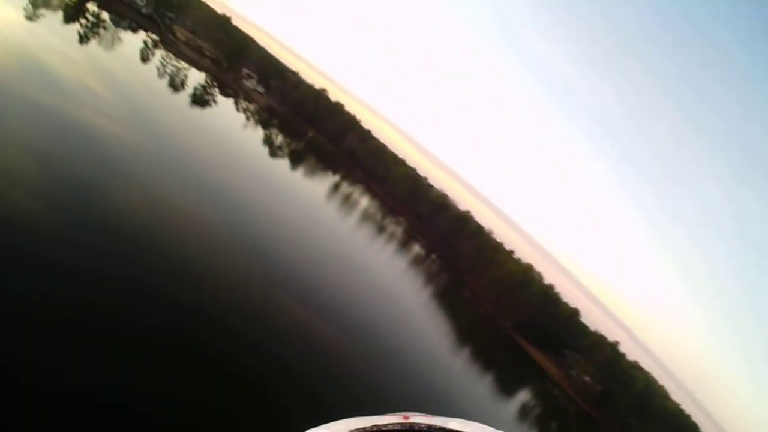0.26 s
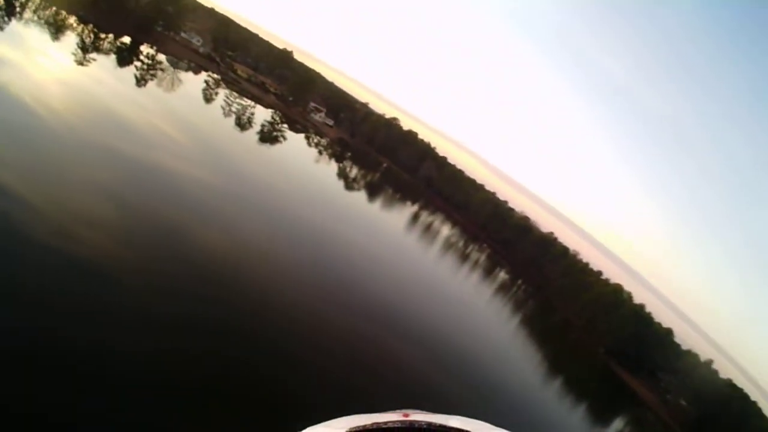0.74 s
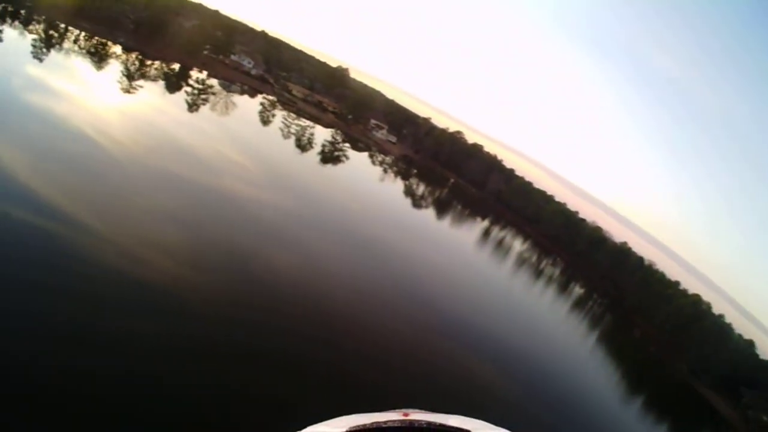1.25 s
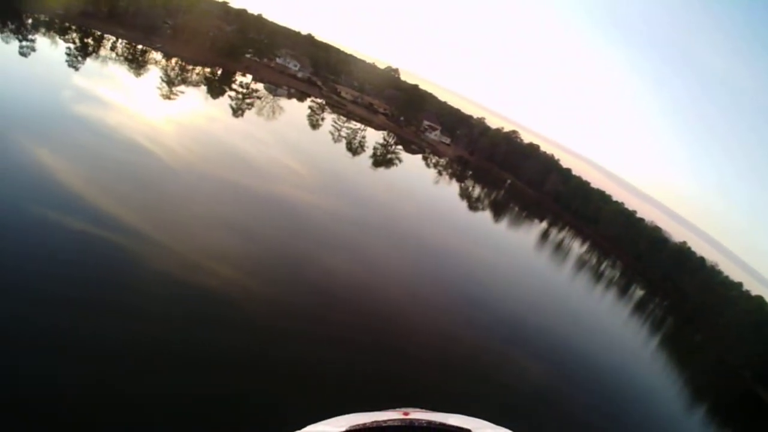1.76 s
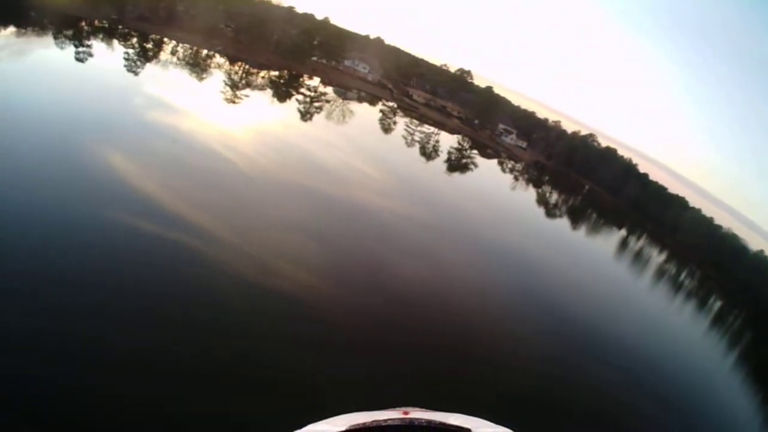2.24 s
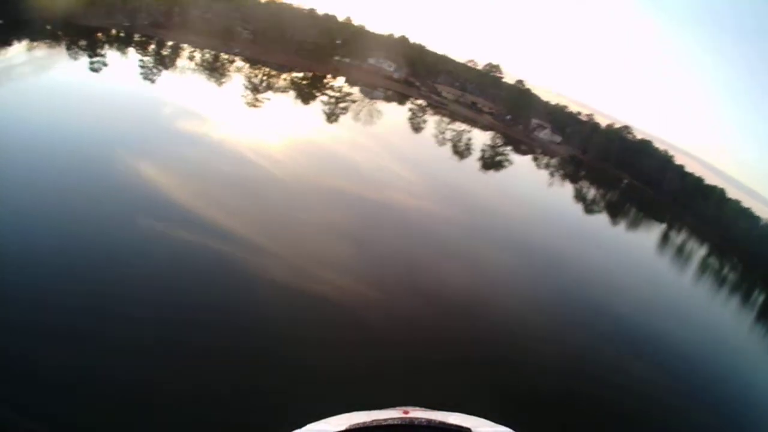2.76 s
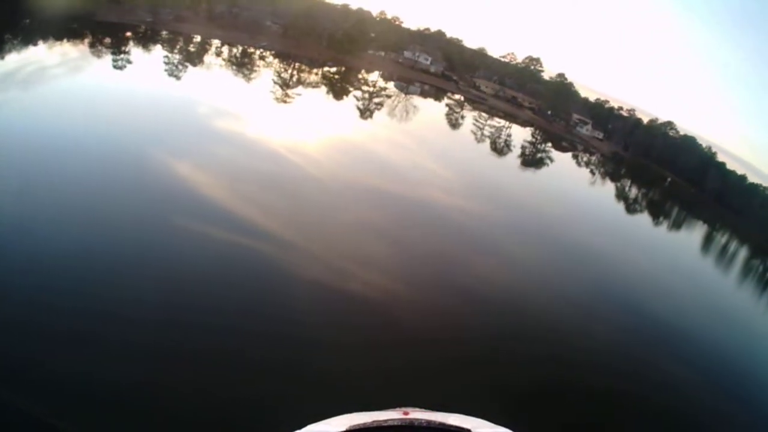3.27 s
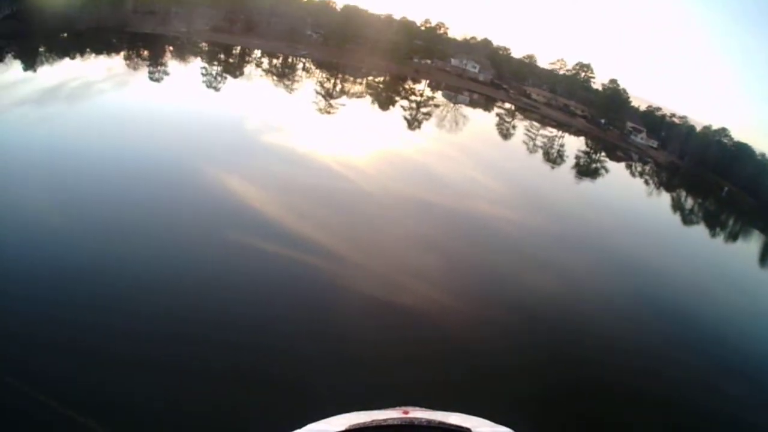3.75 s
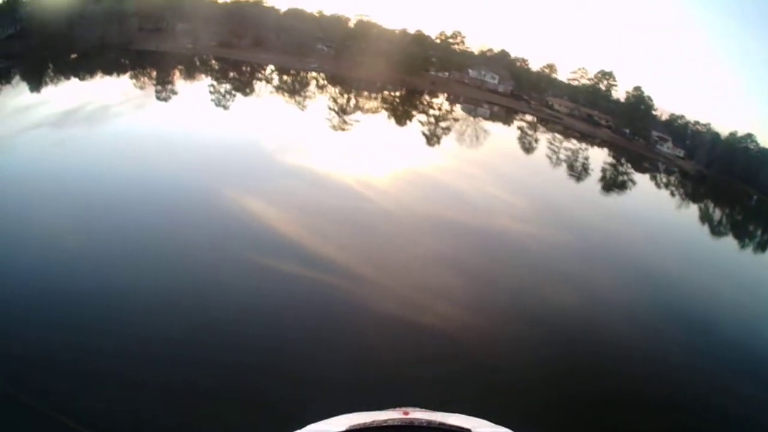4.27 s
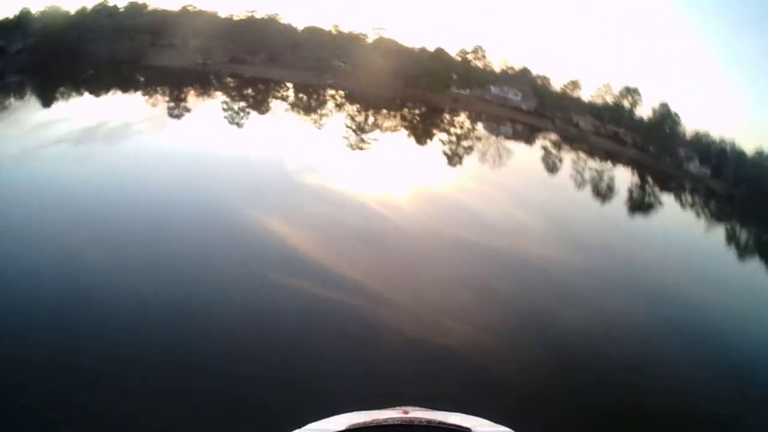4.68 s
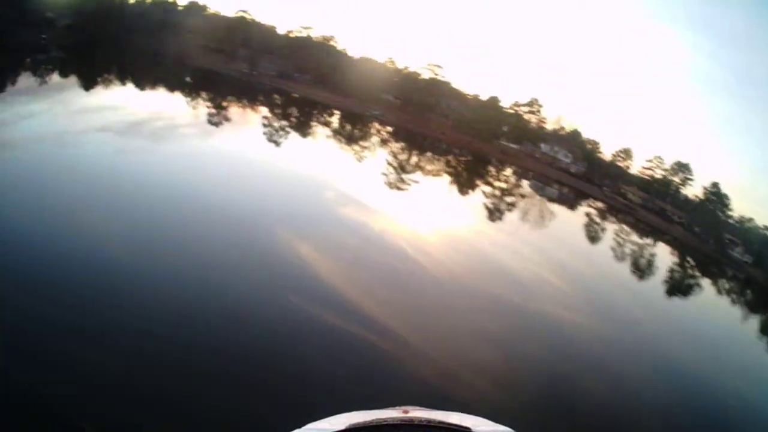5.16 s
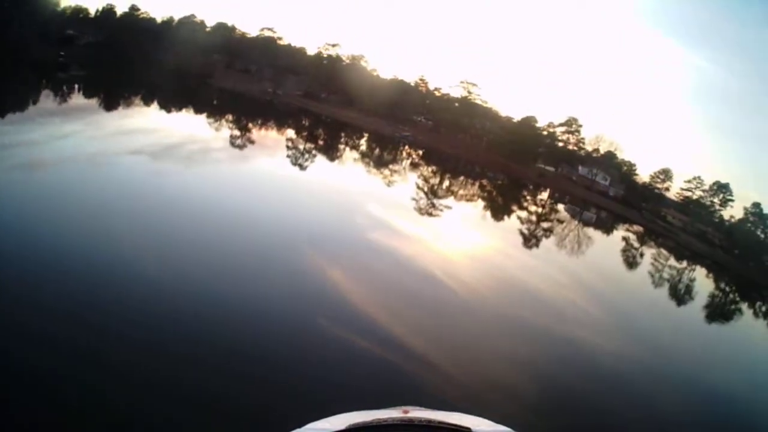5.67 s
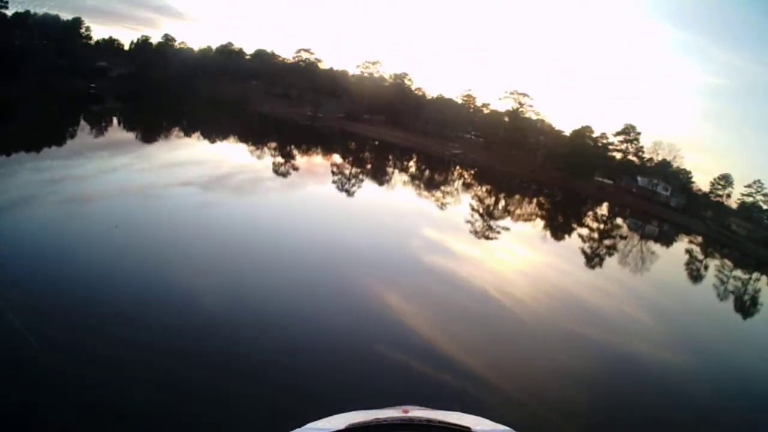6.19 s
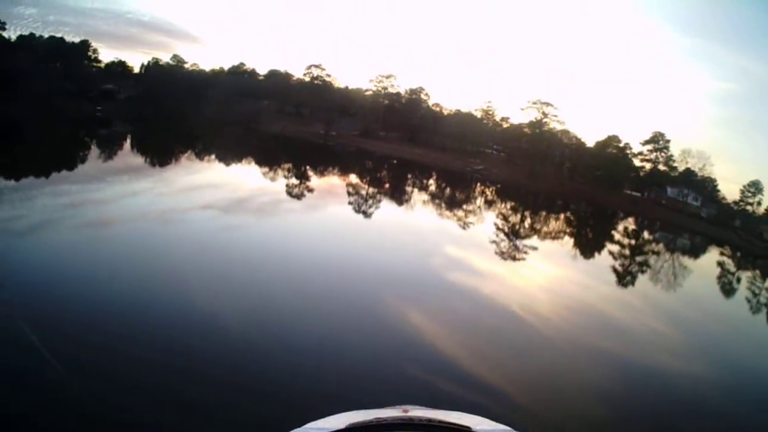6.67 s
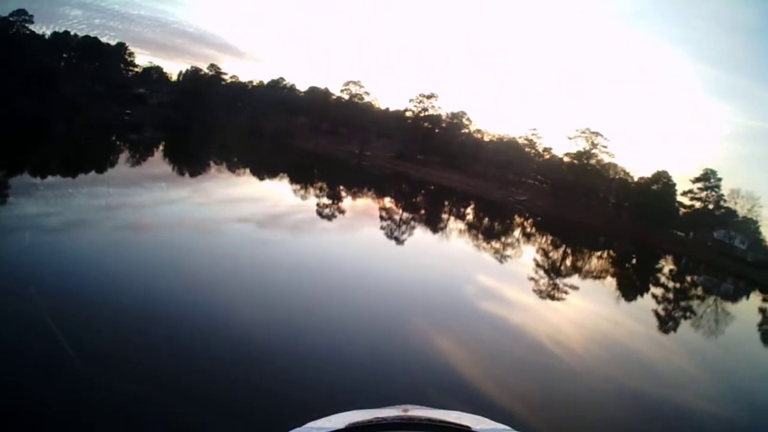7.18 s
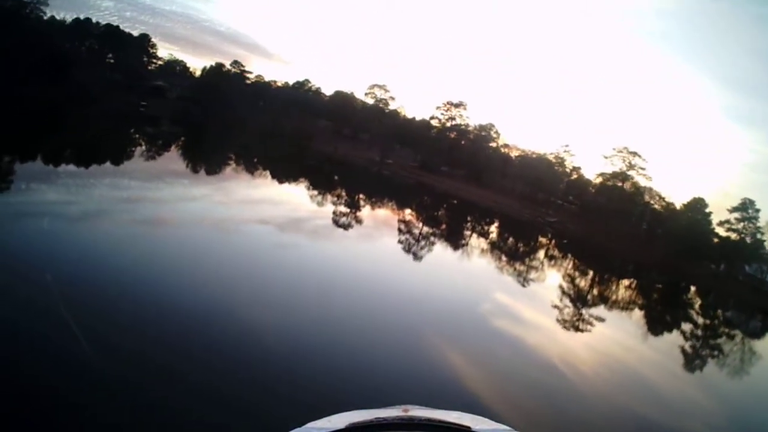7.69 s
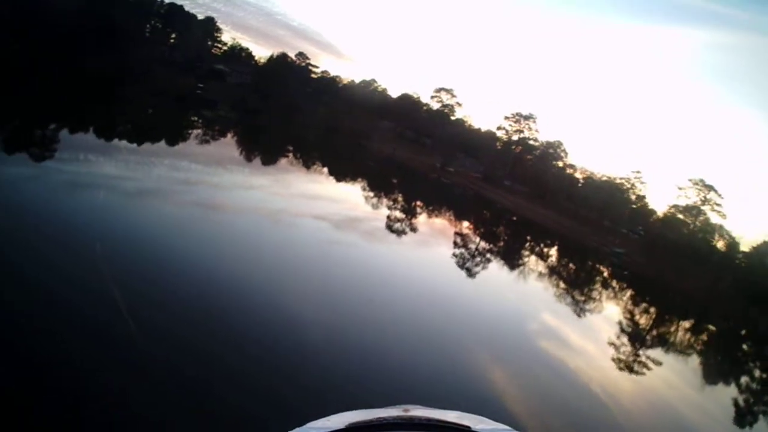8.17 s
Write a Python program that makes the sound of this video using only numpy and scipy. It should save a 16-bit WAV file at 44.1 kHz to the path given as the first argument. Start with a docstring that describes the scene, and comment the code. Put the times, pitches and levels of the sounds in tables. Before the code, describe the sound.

The microphone sits on the body of a small electric seaplane, so everything is close, dry, dull on top and slightly hissy. From 0 to about 5 seconds a propeller hums around 190 hertz with a motor whine near 900, inside a rough, fluttering roar of air. Pitch and roar sag gently; a thin whistle near 4 kilohertz swells around 2 to 4.5 seconds, then fades. At about 5.3 the power is cut: hum and whine slide downward, and the roar drops away to faint low wind by 6.7. At 6.8 the floats hit the lake: a very loud, overloaded slap with a hard rattle of fittings and a short splash. Softer skips follow at 7.35, 7.9 and 8.25, with dull thumps, spray puffs, small knocks on the first two and tiny ringing drops, over a fading low wash until the end at 8.4.

```python
"""A small electric seaplane comes down to a lake, heard by a microphone fixed on its airframe.
At first three propeller blades hum as harmonics of the blade rate, the motor whines at multiples of the
shaft speed, and the slipstream roars as shaped noise; then the power is cut and the shaft coasts down.
Last the floats skip on the water four times: noise bursts of spray with ringing drops, damped hull modes
for the thumps, airframe modes for the knocks of fittings on the first three, and a low wash of noise."""
import sys
import numpy as np
from scipy import signal
from scipy.fft import rfft, irfft, next_fast_len
from scipy.io import wavfile

SR = 44100
rng = np.random.default_rng(int(sys.argv[2]) if len(sys.argv) > 2 else 0)


def digitize_waveform(pressure):
    """Quantize a signal to 16-bit integers and store it at the path in sys.argv[1].

    Rows of a 2-D input are taken as channels; values are limited to [-1, 1].
    """
    field = np.atleast_2d(pressure).T
    bounded = np.clip(field, -1, 1)
    quanta = np.round(bounded * 32767).astype(np.int16)
    wavfile.write(sys.argv[1], SR, quanta)


N = 371763   # samples
CRUISE_TURNS_PER_S = 62
TOUCHDOWN_S = 6.8

# Airflow past the body: t/s, flow level/dB, buffeting level/dB, treble hiss level/dB
AIR = [(0,-0.5,-50.5,-61),(2,-2.2,-51.5,-64),(4,-5,-54.5,-66.5),(5.5,-6,-56.5,-69),(6,-9.5,-54.5,-70),(6.9,-16,-66.5,-75.5),(7.5,-23.5,-65.5,-83),(8.43,-29,-72.5,-92)]
# Transmission of sound through the body: f/Hz, level/dB
BODY_RESPONSE = [(180,-21),(290,-2.5),(380,-7.5),(470,-10),(700,-8),(810,0.5),(1030,-3.5),(1230,1.5),(1500,-13),(1650,-5),(1780,-12.5),(2080,-7),(2450,-16.5),(2720,-6.5),(3200,-23)]


def from_db(db):
    """Amplitude ratio of a level: 20 dB is a factor of ten."""
    return np.exp(np.asarray(db) * (np.log(10) / 20))


def rms_one(x):
    """Normalisation to unit root-mean-square amplitude."""
    return x / np.sqrt(np.mean(x ** 2) + 1e-20)


def in_time(rows):
    """Linear interpolation of each column of a time table, at every sample."""
    s, *columns = np.transpose(rows)
    return [np.interp(np.arange(N) / SR, s, column) for column in columns]


def gain_at(colour, hz):
    """Spectral gain, with the level interpolated over logarithmic frequency."""
    points, levels = np.transpose(colour)
    return from_db(np.interp(np.log(np.maximum(hz, 1)), np.log(points), levels))


def drift(rate):
    """Slow random fluctuation of unit rms: white noise through two equal poles at rate, in Hz."""
    step = 40   # samples between the computed points
    r = np.exp(-2 * np.pi * rate * step / SR)
    white = rng.standard_normal(N // step + 2002)
    slow = signal.lfilter([1], [1, -2 * r, r * r], white)[2000:]   # the filter has settled
    return np.interp(np.arange(N) / step, np.arange(len(slow)), rms_one(slow))


def noise(colour):
    """Spectral shaping of white noise to unit rms, with a fourth-power roll-off at the last point."""
    size = next_fast_len(N, True)
    hz = np.fft.rfftfreq(size, 1 / SR)
    rolloff = 1 + (hz / colour[-1][0]) ** 4
    spectrum = rfft(rng.standard_normal(size)) * gain_at(colour, hz) / rolloff
    return rms_one(irfft(spectrum, size)[:N])


def ring(clicks, hz, t60):
    """Damped resonator: each unit click starts a sine of height 1 that loses 60 dB in t60 seconds."""
    r = np.exp(-np.log(1000) / (t60 * SR))
    w = 2 * np.pi * hz / SR
    return signal.lfilter([0, np.sin(w)], [1, -2 * r * np.cos(w), r * r], clicks + 1e-18)


def clicks_at(times, sizes):
    """Impulse train: each contact is one sample of the given size."""
    return np.bincount(np.round(np.atleast_1d(times) * SR).astype(int), np.atleast_1d(sizes), N)


def tone(cycles, gain, rough, flutter_hz):
    """A partial of rms gain, with amplitude and phase modulated at random by turbulence."""
    shaken = cycles + rng.random() + rough * drift(flutter_hz) / (2 * np.pi)
    angle = (2 * np.pi * (shaken - np.floor(shaken))).astype(np.float32)
    height = np.sqrt(2) * gain * (1 + rough * drift(flutter_hz))
    return height * np.cos(angle)


def shaft_speed():
    """Relaxation: after the powered run the speed decays exponentially to that of windmilling."""
    # shaft under power: t/s, speed/(turns per s)
    powered_run = [(0,66),(.8,65.9),(1.8,65.25),(1.93,64.8),(2.25,64.7),(2.77,63.2),(3.12,63.2),(3.26,62.8),(3.59,62.8),(3.69,62.4),(4.04,61.9),(4.39,62),(4.84,61.7),(5.26,58.5),(5.5,53.9)]
    windmill_turns_per_s, coast_s = 5.2, 1.65   # final speed; time constant
    powered, = in_time(powered_run)
    coasted = np.maximum(np.arange(N) / SR - powered_run[-1][0], 0)
    return windmill_turns_per_s + (powered - windmill_turns_per_s) * np.exp(-coasted / coast_s)


def propeller(speed, turns):
    """Blade-rate harmonics: three blades pass per turn, and the tones swell in resonances they cross."""
    # harmonics of the blade rate: multiple of shaft speed, level/dB at cruise ahead of the response
    blade_orders = [(3,-46.5),(6,-48),(9,-48.5)]
    # transmission of blade tones by the wings and body: f/Hz, level/dB
    blade_response = [(45,-15),(80,-6),(93,7.5),(104,0),(140,-1),(178,0),(190,-4.5),(202,-17),(235,-18.5),(268,-4),(335,-13.5),(362,-10.5),(388,-11.5),(398,-7),(430,-18),(500,-10),(590,-27)]
    speed_db = 9 * np.log2(speed / CRUISE_TURNS_PER_S)   # 9 dB per octave of speed
    out = 0
    for multiple, level_db in blade_orders:
        gain = from_db(level_db + speed_db) * gain_at(blade_response, multiple * speed)
        out = out + tone(multiple * turns, gain, rough=.1, flutter_hz=7.2)
    return out


def through_body(hz, mount_db):
    """Structural transmission: the mount's resonance, mount_db high, in series with the body."""
    mount_hz, mount_width_hz = 1255, 110
    mount = 1 / (1 + np.square(2 * (hz - mount_hz) / mount_width_hz))
    return gain_at(BODY_RESPONSE, hz) * from_db(mount_db * mount)


def motor(speed, turns):
    """Order-locked tones: fourteen magnets and three coil phases sound at multiples of shaft speed."""
    # current chopping at part throttle: t/s, relative whistle level/dB, relative mirror tone level/dB
    chopping = [(0,-9.5,-26),(1.2,-7,-20),(2.3,-0.5,-9.5),(3.3,2.5,-2),(4.75,-3.5,-0.5),(5.05,-12,-2),(5.35,-40,-18),(5.7,-69,-49)]
    # weaker tones: multiple of shaft speed, level/dB ahead of load and body
    shaft_orders = [(12,-55.5),(13,-55.5),(14,-58),(15,-58.5),(18,-56.5),(21,-57),(21.7,-62.5),(24,-61.5),(25.2,-56),(27,-62.5),(30,-59),(42,-66.5),(43.4,-57)]
    power_off_s, power_fade_db_per_s = 5.39, 90
    chopping_base_db = -70.5
    mirror_sum_hz = 7835   # the whistle and its mirror tone add up to this
    mount_db, weak_mount_share = 11.5, 0.13   # mount resonance; share of it for the weaker tones

    t = np.arange(N) / SR
    chopping_db, mirror_db = in_time(chopping)
    flow_db = in_time(AIR)[0]
    power = from_db(-power_fade_db_per_s * np.maximum(t - power_off_s, 0))

    # the magnet whine follows 0.48 of the airflow's swing, the cogging half of the chopping's
    out = tone(14 * turns, from_db(-48 + 0.48 * flow_db) * power, rough=0.1, flutter_hz=22)
    out += tone(42 * turns, from_db(-57.5 + .5 * chopping_db), rough=0.18, flutter_hz=50)

    # another whine takes over as the power goes; it sinks with speed and drops 10 dB at touchdown
    coasting_db = -48 + 13.5 * np.log2(speed / CRUISE_TURNS_PER_S) - .5 - 10 * (t > TOUCHDOWN_S)
    coasting = (1 - power) * through_body(36 * speed, mount_db)
    out += tone(36 * turns, from_db(coasting_db) * coasting, rough=0.33, flutter_hz=34.44)

    # the controller's whistle has a mirror tone that rises as the shaft slows
    switching = 63 * turns
    controller = from_db(chopping_base_db + chopping_db)
    mirror_gain = from_db(chopping_base_db + mirror_db)
    out += tone(switching, controller * from_db(-1), rough=.15, flutter_hz=10)
    out += tone(mirror_sum_hz * t - switching, mirror_gain, rough=.15, flutter_hz=10)
    out += tone(84 * turns, controller * from_db(-15.5), rough=.2, flutter_hz=10)

    # weaker tones swell and fade as they slide through the body's resonances
    load = from_db(np.maximum(flow_db, -16))   # lowest with the shaft idling
    for multiple, level_db in shaft_orders:
        body = through_body(multiple * speed, weak_mount_share * mount_db)
        out += tone(multiple * turns, load * from_db(level_db) * body, rough=0.17, flutter_hz=18)
    return out


def airflow(turns):
    """Turbulent broadband noise: buffeting, rush and hiss modulated at the blade rate, and glide wind."""
    # wind of the slow glide: t/s, level/dB
    glide = [(0,-68),(5.8,-66.5),(6.6,-58),(7.8,-56.5),(8.1,-62),(8.43,-66.5)]
    # spectra of buffeting, treble hiss and glide wind: f/Hz, relative level/dB
    buffet_colour = [(20,1.5),(45,-5),(90,3),(140,-2),(220,-4.5),(330,-5),(450,-11),(800,-25)]
    hiss_colour = [(2000,-8),(3000,-3),(3500,0),(4100,-1),(4650,7.5),(5000,-4),(5600,-5.5),(6500,-25)]
    glide_colour = [(40,-1.5),(130,0.5),(280,-2),(380,-4.5),(500,-16.5),(720,-20.5),(1000,-2),(1200,-8.5),(1400,-17.5),(2200,-24),(3000,-29),(5000,-35)]
    flow_db, buffet_db, hiss_db = in_time(AIR)
    glide_db, = in_time(glide)
    blade_angle = 2 * np.pi * 3 * turns
    pulsing = 1 + .23 * np.cos(blade_angle) + .33 * np.cos(2 * blade_angle)
    buffet = from_db(buffet_db + 1.5 * drift(8.5)) * noise(buffet_colour)
    rush = from_db(-44 + flow_db + .6 * drift(33)) * noise(BODY_RESPONSE)
    hiss = from_db(hiss_db + .8 * drift(17)) * noise(hiss_colour)
    return buffet + (rush + hiss) * pulsing + from_db(glide_db) * noise(glide_colour)


def spray():
    """Noise bursts and damped rings: spray rises, sags as a float ploughs, dies; drops strike the floats."""
    # floats ploughing the water: t/s, spray level/dB, contact length/s
    splashes = [(6.785,-35.5,0.045),(7.346,-48,0.18),(7.615,-64,.005),(7.868,-46.5,0.075),(8.025,-54,0.0268),(8.234,-49.5,0.24)]
    # drops striking the floats: t/s, peak level/dB, f/Hz, t60/s
    drop_strikes = [(7.548,-45,1083,0.019),(7.6135,-52,1050,0.018),(7.9823,-44.5,1010,0.04),(8.018,-41,1120,0.025),(8.068,-40.5,945,0.018)]
    # spectrum of the spray: f/Hz, relative level/dB
    spray_colour = [(40,6.5),(110,4),(230,-2.5),(350,-8),(480,-12.5),(680,-12.5),(850,-2),(1100,-2),(1300,-1),(1550,-11),(2300,-8),(2750,-12),(3300,-24),(4700,-19.5),(6000,-29)]
    rise_db_per_s, sag_db_per_s = 1300.5, 45.5
    fall_db_per_s = 187.5   # on top of the sag, after contact
    t = np.arange(N) / SR
    level = 0
    for s, db, length in splashes:
        loss_db = rise_db_per_s * np.maximum(s - t, 0)
        loss_db += sag_db_per_s * np.maximum(t - s, 0)
        loss_db += fall_db_per_s * np.maximum(t - s - length, 0)
        level = level + from_db(db - loss_db)
    drops = sum(ring(clicks_at(s, from_db(db)), hz, t60) for s, db, hz, t60 in drop_strikes)
    return level * from_db(2.5 * drift(90)) * noise(spray_colour) + drops


def floats():
    """Modal excitation: slaps thump the damped hull modes, and soft ones heave only the low modes."""
    # slaps on the hull: t/s, level/dB, f/Hz at which the excitation is 6 dB down
    thumps = [(6.788,-24,34),(6.7986,-15,1100),(7.347,-30,110),(7.363,-29,150),(7.371,-20,36),(7.887,-23,38.5),(7.8993,-38.5,180),(8.225,-40,259),(8.258,-33.5,220)]
    # hull modes: f/Hz, relative level/dB, t60/s
    hull = [(31,-2.5,0.087),(72,-12.5,.08),(122,-0.5,.065),(170,7,0.031),(267,-9,.025),(335,-6,0.057),(550,-0.5,0.016)]
    s, level_db, edge_hz = np.transpose(thumps)
    out = 0
    for hz, mode_db, t60 in hull:
        softness = 1 / (1 + (hz / edge_hz) ** 4)
        out = out + ring(clicks_at(s, from_db(level_db + mode_db) * softness), hz, t60)
    return out


def rebounds(count):
    """Inelastic impact: every knock is a short, uneven run of ever weaker contacts."""
    # knocks of loose fittings: t/s, level/dB, tilt/(dB per octave), relative level of own ring/dB
    knocks = [(6.7925,-6,9,-20.5),(6.7946,1,-1,-20),(6.7962,-5.5,1.5,-24),(6.8004,3,-1,-11.5),(6.8062,-10.5,-1,-24),(6.8105,-13,12,-9.5),(6.8132,-15,13,-5),(7.377,-15,.5,-17),(7.382,-11.5,4,-13.5),(7.3845,-13,0.5,-11),(7.897,-10.5,4.5,-6)]
    gap_s, scatter, loss_db = .002, .3, 10.5   # spacing; its relative scatter; loss per rebound
    rows = []
    for s, db, tilt_db, own_db in knocks:
        delays = gap_s * np.arange(count) * (1 + scatter * rng.uniform(-0.89, 1, count))
        for k, delay in enumerate(delays):
            rows.append((s + delay, db - loss_db * k, tilt_db, own_db))
    return rows


def fittings():
    """Impact excitation: fittings ring and knock airframe modes, the high ones more at a rising tilt."""
    # airframe modes: f/Hz, relative level/dB, t60/s
    airframe = [(872,-13.5,0.014),(1064,-13.5,0.033),(1292,-11,0.018),(1560,-18,0.045),(1840,-7.5,0.0055),(2370,-11,0.007),(2900,-10,0.0062),(3550,-15,0.005),(4230,-18,.011),(4880,-17.5,.006)]
    s, level_db, tilt_db, own_db = np.transpose(rebounds(count=2))
    out = ring(clicks_at(s, from_db(level_db + own_db)), hz=2388, t60=0.02)
    for k, (hz, mode_db, t60) in enumerate(airframe):
        scatter_db = rng.normal(0, 1, len(s))
        strength_db = level_db + mode_db + tilt_db * np.log2(hz / 2000) + scatter_db
        direction = -(-1) ** k   # successive modes swing in opposite directions
        out += direction * ring(clicks_at(s, from_db(strength_db)), hz, t60)
    return out


def wake():
    """Decaying flow noise: water washes under the floats and quietens as the plane slows."""
    # spectrum of the low wash: f/Hz, relative level/dB
    wake_colour = [(150,-13),(260,-2),(340,-0.5),(420,-3.5)]
    afloat = np.arange(N) / SR - TOUCHDOWN_S
    level_db = -58 - 9.5 * np.maximum(afloat, 0)   # fades 9.5 dB per s
    return (afloat > 0) * from_db(level_db) * noise(wake_colour)


def scene():
    """Superposition: all sources add at one point on the airframe, with no room around it."""
    speed = shaft_speed()
    turns = np.cumsum(speed * (1 + .0005 * drift(5))) / SR
    powered = propeller(speed, turns) + motor(speed, turns)
    water = spray() + floats() + fittings() + wake()
    return (powered + airflow(turns) + water)[None]


def record(dry):
    """Band limit and overload: a dull, hissy little microphone clips at the hardest slap."""
    # spectrum of the microphone's hiss: f/Hz, relative level/dB
    mic_colour = [(100,2),(5000,1),(9000,-14)]
    mic_top_hz, overload, cutoff_hz = 5410, .73, 16500
    hissy = dry + from_db(-72) * noise(mic_colour)
    dull = signal.sosfilt(signal.butter(14, mic_top_hz, fs=SR, output="sos"), hissy)
    clipped = np.clip(dull, -overload, overload)
    return signal.sosfilt(signal.cheby2(12, 70, cutoff_hz, fs=SR, output="sos"), clipped)


dry = scene()
out = record(dry)
digitize_waveform(out)
```